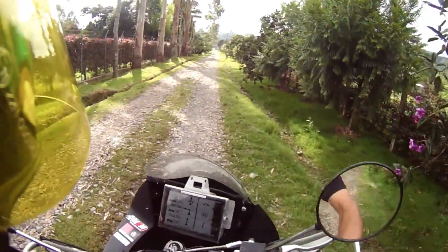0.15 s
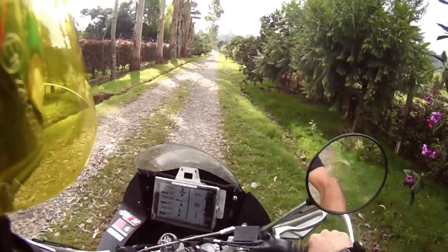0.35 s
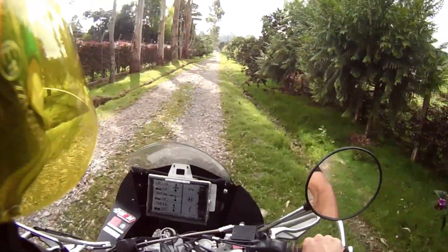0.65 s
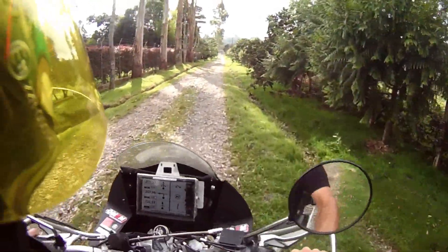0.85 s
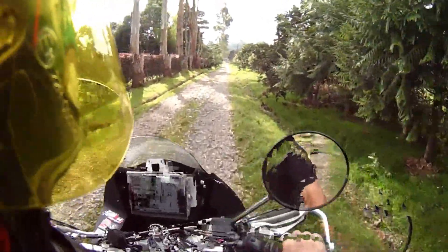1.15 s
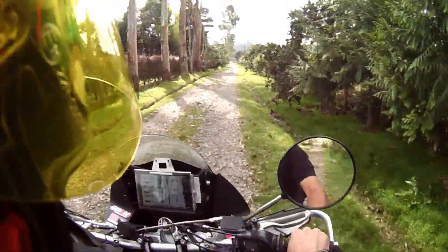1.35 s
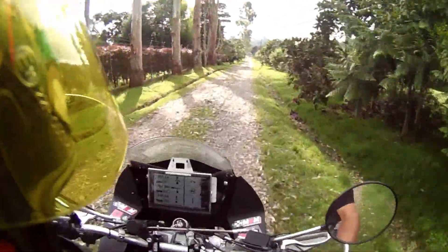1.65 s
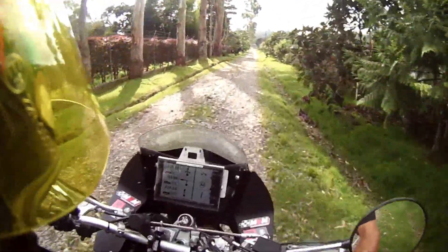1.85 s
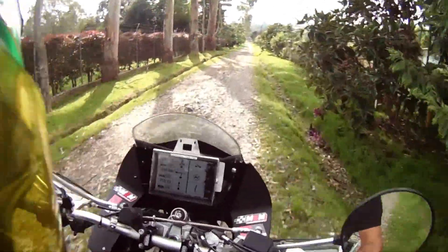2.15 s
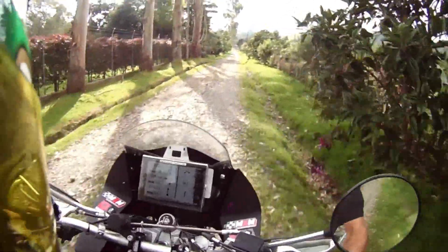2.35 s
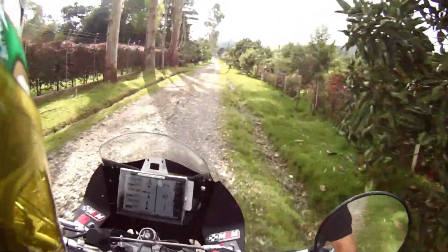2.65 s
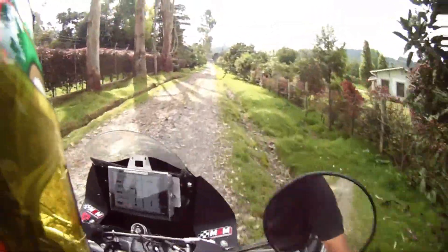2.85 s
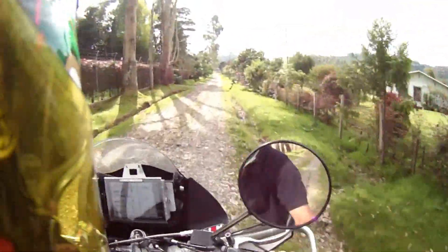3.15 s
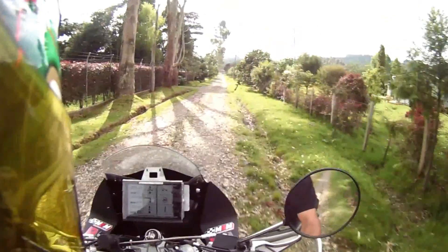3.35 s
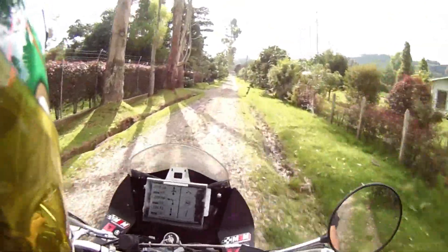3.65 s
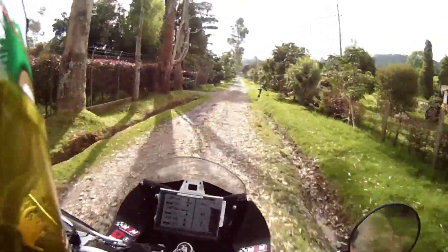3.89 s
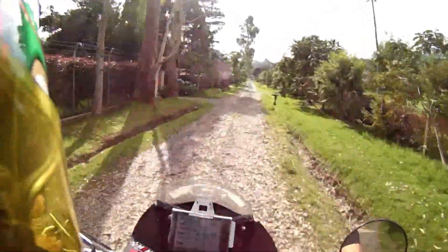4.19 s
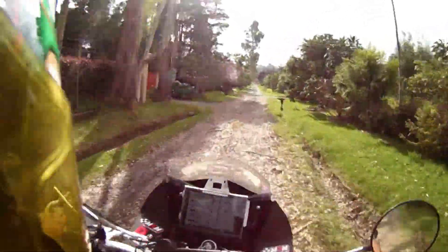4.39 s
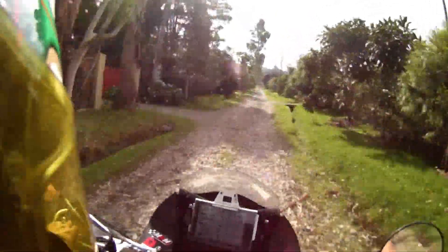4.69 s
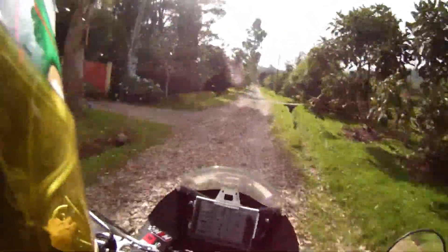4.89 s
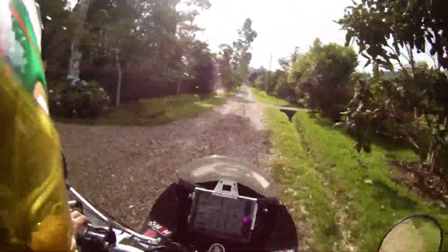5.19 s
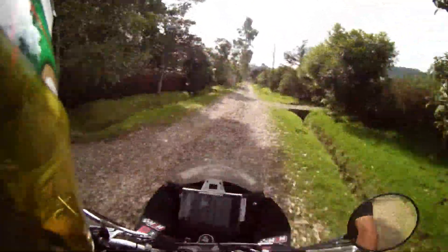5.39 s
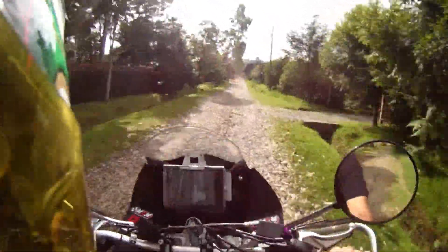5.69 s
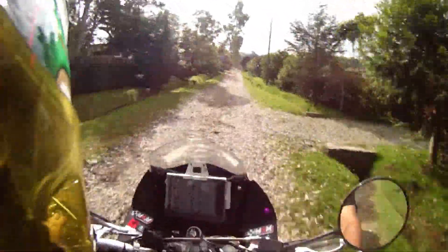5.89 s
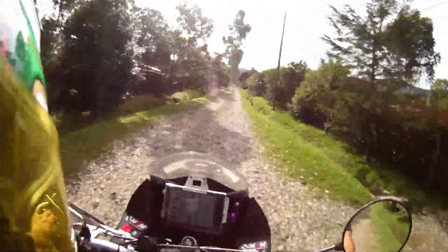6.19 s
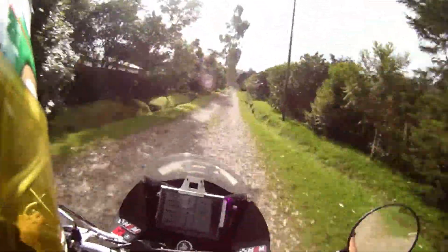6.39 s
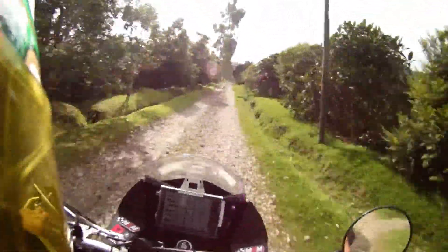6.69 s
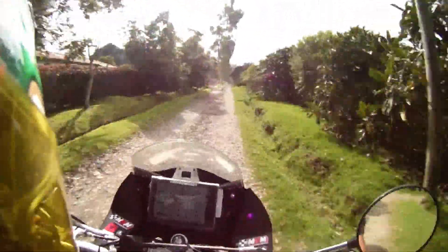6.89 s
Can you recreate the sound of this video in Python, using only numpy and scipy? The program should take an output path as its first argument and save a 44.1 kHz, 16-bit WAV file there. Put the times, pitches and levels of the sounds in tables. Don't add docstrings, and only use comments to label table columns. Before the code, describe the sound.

A single-cylinder motorbike chuffs unevenly, pulls away on gravel, knocks hard once, then is swallowed by roaring, buffeting, overloaded wind with stone cracks.

```python
import sys
import numpy as np
from scipy import signal
from scipy.fft import rfft, irfft
from scipy.io import wavfile
from scipy.ndimage import uniform_filter1d, map_coordinates

SR = 44100
rng = np.random.default_rng(int(sys.argv[2]) if len(sys.argv) > 2 else 0)


def master_out(mix):
    frames = np.transpose(np.atleast_2d(mix))
    ceiling = np.clip(frames, -1, 1)
    pcm = np.round(ceiling * 32767).astype(np.int16)
    wavfile.write(sys.argv[1], SR, pcm)


def invert_db(x):
    u = np.asarray(x, float) / 20
    return 10 ** u


N = 310464
T = np.arange(N) / SR

# (time [s], firing rate [Hz])
FIRING_RATE = [(.7398, 10.63), (.9, 11.13), (1.1, 11.06), (1.3, 12.66), (1.5, 13.97), (1.75, 16.4),
               (2.0, 18.3), (2.3, 21.75), (2.75, 24.8), (3.5, 33.1), (4, 40.3), (4.15, 43.5), (4.3, 43.5),
               (4.45, 31.5), (4.7, 29.4), (5.15, 31.9), (6.05, 36.3), (7.04, 42)]
# (time [s], peak level [dB])
CHUFFS = [(0.0044, -67), (0.0633, -70), (0.119, -47.5), (0.1875, -37), (0.2698, -47.5), (0.31, -34),
          (0.372, -37.5), (0.478, -38), (0.534, -37.5), (0.596, -45.5), (0.627, -49), (0.6779, -50)]
# (time [s], level from the mean [dB])
STROKES = [(.74, -2.5), (.83, -2.5), (.92, -2.5), (1.1, 1.5), (1.27, 2), (1.5, 2.5), (1.57, -1.5),
           (1.64, -1.5), (1.7, 0), (1.765, -5), (1.826, -3.5), (1.885, 1), (1.94, -2), (2.05, 2),
           (2.245, 2), (2.34, -1), (2.39, 5)]
# (time [s], level [dB])
LOAD = [(0, -3), (.3, 3), (.76, 1), (1.8, -1.5), (2.25, -7.5), (3.1, -2), (4, 1.5), (4.2, -0.5), (4.45, -2),
        (4.8, 2), (5.2, 1.5), (5.88, 3), (7.04, 4.5)]
# (frequency [Hz], density [dB per Hz])
CLATTER_COLOUR = [(88, -22.5), (150, -9), (320, -6), (420, -10.5), (950, -2), (1260, -4.5), (1880, -9.5),
                  (2100, -12), (2600, -13.5), (3500, -26.5), (4200, -21.5), (5400, -32.5), (8000, -33.5),
                  (14000, -57.5)]
# (frequency [Hz], width [Hz], gain [dB])
CASE_RINGS = [(328, 24, 6.5), (872, 55, 4.5), (935, 40, -1), (1134, 26, 5.5), (1295, 73, 5), (1420, 69, 6),
              (1760, 110, 3), (2960, 410, 0), (4320, 110, 3.5), (4430, 960, 1.5), (4850, 90, 2.5),
              (7480, 170, 5.5)]
# (frequency [Hz], level [dB], t60 [s], pitch share lost as it dies [1])
STRUCK_MODES = [(896, -13.5, 0.064, 0.13), (1155, -6, 0.23, 0.062), (1199, -6.5, 0.16, -0.065),
                (1398, -4, 0.17, 0.1505), (1904, -8.5, 0.12, 0.058), (2472, -10.5, 0.05, 0.13),
                (2756, -6, 0.072, -0.078)]
# (time [s], frequency [Hz], level above the clatter [dB])
FRAME_HUM = [
    (0, 1170, -1),
    (.32, 1170, 9),
    (.39, 1210, 5),
    (.44, 1215, 9),
    (.56, 1155, 11.5),
    (.65, 1170, -4),
    (.8, 1170, -6.5),
    (7.04, 1150, -8.5),
]
# (start [Hz], end [Hz], width [Hz], level [dB])
HEADER_MODES = [(1320, 915, 68, -4), (1966, 1770, 60, -2), (2905, 2700, 120, -7)]
# (frequency [Hz], level [dB])
PIPE = [(35, -16), (65, -18), (110, -16), (225, -17), (265, -2), (290, -1.5), (325, -4), (380, -16),
        (500, -16)]
# (time [s], stretch [1])
PIPE_STRETCH = [
    (4.4, 1),
    (4.95, 1.12),
    (5.4, 1.12),
    (5.9, 1.04),
]
# (frequency [Hz], density [dB per Hz])
RUMBLE_COLOUR = [(8, -1), (20, 1.5), (35, 4.5), (60, 3), (120, -5), (250, -10.5), (500, -58.5)]
# (time [s], level above the rumble [dB])
BUMPS = [(.5, 5.5), (1.29, 4), (1.76, 7), (2.15, 2), (2.58, 8), (3.07, 6.5), (3.44, 13), (3.81, 1.5),
         (5.06, 6), (5.9, 6.5), (6.38, 5), (6.7, 9), (7.04, 13)]
# (time [s], level [dB], dull part above it [dB])
WIND = [(2.25, -53, -14), (2.6, -52, 0), (3.0, -36, 3.5), (3.22, -41, -15), (3.47, -26.5, 1.5),
        (3.72, -35.5, -3), (3.89, -34.5, -0.5), (4.25, -19.5, -7), (4.35, -32.5, 3), (4.62, -17.5, -17.5),
        (4.76, -25, 1), (5.05, -22.5, -16), (5.56, -16, -16), (5.91, -25, -3), (6.3, -17.5, -16.5),
        (6.4, -20, -5), (6.6, -16.5, -12.5), (7.04, -17, -9.5)]
# (time of the top [s], rms level [dB], width [s], dull part [dB])
GUSTS = [(3.056, -28.5, 0.045, 0.5), (3.119, -27.5, 0.022, -18), (3.279, -33, 0.027, -15),
         (3.442, -24.5, 0.12, -1.5), (3.557, -21.5, 0.11, 0), (3.888, -31, 0.076, 4),
         (3.996, -22.5, 0.044, -1), (4.171, -26, 0.038, -18), (4.372, -16, 0.026, -23),
         (4.464, -15.5, 0.071, -18), (4.545, -18.5, 0.058, -21), (4.806, -17, 0.057, -19),
         (4.901, -17.5, 0.067, -5), (4.992, -15, 0.018, -11), (5.126, -11, 0.012, -7),
         (5.288, -15, 0.029, -22), (5.365, -15, 0.012, -7), (5.457, -12, 0.0095, -25),
         (5.49, -11.5, 0.015, -19), (5.693, -27, 0.032, -21), (5.758, -18.5, 0.01, -18),
         (5.83, -14.5, 0.046, -26), (5.983, -16, 0.12, -9), (6.102, -9, 0.023, -10),
         (6.137, -11.5, 0.017, 0.5), (6.216, -12.5, 0.061, -28), (6.274, -11, 0.012, -23),
         (6.398, -12, 0.048, -5.5), (6.781, -6.5, 0.018, -2), (6.943, -10.5, 0.012, -27)]
# (time of the top [s], rms level [dB], dull part [dB])
PUFFS = [(2.905, -40.5, 16), (3.385, -25.5, 5), (3.494, -20, -5), (3.589, -27, -14), (5.198, -15.5, -22),
         (3.925, -17, -3), (4.134, -33, -8), (4.409, -15, -21), (4.697, -15.5, -5.5), (4.739, -17.5, -8),
         (5.096, -17, -6), (5.159, -15, -2), (5.253, -14, -19), (5.405, -7.5, -32), (5.869, -9, -13),
         (5.904, -15.5, -6), (5.942, -19, -4), (5.998, -9.5, 0.5), (6.169, -10, -1), (6.327, -14, -19),
         (6.452, -9.5, -20), (6.5, -12, -3), (6.528, -8, -15), (6.617, -17.5, -4), (6.743, -19, 2),
         (6.821, -9.5, -8.5), (6.847, -10, -22), (6.872, -8.5, -25), (6.896, -12.5, -10), (6.972, -19, -13)]
# (time [s], depth [dB])
LULLS = [(3.373, -5), (3.58, -7), (3.655, -8), (4.33, -9), (4.363, -2.5), (5.481, -1), (6.092, -2),
         (6.963, -3.5), (5.075, -6), (5.43, -2.5), (5.52, -8.5), (5.8, -3), (5.924, -20), (6.152, -5),
         (6.69, -3.5), (6.793, -9), (6.911, -1.5)]
# (frequency [Hz], density [dB per Hz])
PORT_COLOUR = [(240, -44.5), (400, -6.5), (1090, 1.5), (1410, -2.5), (2500, -32), (3250, -43.5),
               (5500, -120)]
DULL_COLOUR = [(65, -36), (110, -10), (220, -5), (350, -3.5), (490, -4), (700, -3.5), (910, -10.5),
               (1540, -100)]
BRIGHT_COLOUR = [(1000, -7), (1700, 5.5), (2460, -7), (2670, -9), (4260, -15.5), (5500, -35.5),
                 (7600, -49.5), (10000, -65), (14000, -79)]
# (time [s], frequency [Hz])
PORT_PITCH = [(2.85, 1100), (3.41, 879), (3.8, 1040), (4.17, 929.4), (4.57, 1102), (4.72, 901.4),
              (5.13, 1080), (5.6, 1040), (5.82, 1129), (5.89, 898), (6.09, 1029), (6.15, 858), (6.35, 1091),
              (6.51, 899.4), (6.57, 1035), (6.72, 850), (6.78, 1049), (7.04, 1079)]
# (time [s], peak level [dB], frequency [Hz], length [cycles], sign [1])
SLAPS = [(1.734, -26, 900, 1.5, 1), (1.835, -29, 950, 2.5, 1), (1.8915, -23, 600, .7, -1),
         (2.344, -32, 1150, 2.5, 1), (3.5875, -13, 1050, 2.5, 1), (5.098, -9, 1250, 1, -1),
         (5.1255, -3, 1100, .75, 1), (5.125, -18.5, 3400, 1.5, 1), (5.13, -6, 1300, .8, 1),
         (5.131, -21, 3300, 1.2, 1), (5.158, -19.5, 3800, 2, 1), (5.161, -5.5, 900, .9, -1),
         (5.981, -2, 1100, .9, 1), (6.054, -1.5, 1050, 1.1, -1), (6.17, -1.5, 1000, 1, -1),
         (6.4958, .55, 900, .62, -1), (6.6162, -1.5, 1000, .9, 1), (6.7055, -.2, 950, .9, 1),
         (6.7713, 1.7, 1200, .75, 1), (6.7801, -.5, 1250, .9, 1), (6.7837, 2.7, 1100, .65, 1),
         (6.7872, -.5, 1100, 1, -1), (6.8213, 2.3, 1000, .72, 1)]
# (time [s], peak level [dB],
# frequency [Hz])
EDDIES = [(3.0511, -17, 880), (3.2503, -18, 1240), (3.2813, -17, 970), (3.2875, -17, 1050),
          (3.3868, -14, 990), (3.4939, -8, 940), (3.5263, -9, 880), (3.5454, -9, 910),
          (3.5572, -8, 920), (3.5907, -10, 1040), (3.6258, -14, 740), (3.6902, -16, 1200),
          (3.8871, -14, 1200), (3.9226, -12, 850), (3.9688, -13, 970), (4.0043, -11, 980),
          (4.0452, -10, 1030), (4.1332, -10, 930), (4.1584, -10, 770), (4.17, -9, 820),
          (4.2206, -10, 800), (4.2905, -9, 1050), (4.3706, -9, 1040), (4.4013, -8, 840),
          (4.4075, -7, 1010), (4.4414, -9, 1020), (4.4482, -8, 1000), (4.5215, -8, 1070),
          (4.5737, -9, 1160), (4.6724, -9, 1130), (4.699, -8, 1000), (4.7122, -9, 710),
          (4.7384, -10, 1050), (4.7843, -9, 970), (4.7912, -7, 930), (4.8059, -8, 850),
          (4.8304, -8, 1100), (4.8378, -10, 830), (4.8803, -10, 960), (5.0027, -10, 1180),
          (5.0362, -12, 1240), (5.0953, -9, 1270), (5.199, -8, 1120), (5.2532, -7, 1210),
          (5.2905, -5, 980), (5.3227, -9, 1120), (5.3557, -5, 890), (5.3637, -8, 1270),
          (5.3695, -5, 870), (5.4006, -3, 1000),
          (5.4073, -5, 1050), (5.4533, -8, 1160), (5.4895, -3, 1170), (5.5038, -6, 1000),
               (5.5362, -5, 1000), (5.6205, -5, 1060), (5.6694, -9, 1160), (5.6917, -7, 1230),
               (5.7015, -5, 1170), (5.7084, -8, 1050), (5.7521, -9, 1100), (5.7626, -9, 1000),
               (5.8285, -5, 1030), (5.8651, -5, 910), (5.9045, -5, 980), (5.9419, -7, 1010),
               (5.9966, -3, 890), (6.0729, -6, 1060), (6.1003, -4, 1100), (6.1108, -5, 890),
               (6.1336, -2, 900), (6.2116, -2, 990), (6.2369, -5, 1110), (6.2767, -5, 1050),
               (6.2968, -6, 1180), (6.3212, -6, 990), (6.3282, -6, 1090), (6.3423, -7, 940),
               (6.3656, -5, 880), (6.3783, -5, 980), (6.3983, -2, 960), (6.4193, -2, 1100),
               (6.4306, -5, 1010), (6.4561, -4, 960), (6.5291, -4, 800), (6.5612, -7, 1130),
               (6.6485, -7, 1000), (6.6658, -7, 780), (6.7126, -6, 990), (6.7361, -6, 980),
               (6.7444, -5, 850), (6.7504, -4, 910), (6.8492, -1, 1010), (6.8717, -2, 1030),
               (6.8923, -4, 1060), (6.8983, -4, 960), (6.9374, -6, 1120), (6.9458, -4, 1090),
               (6.9719, -5, 1200), (7.019, -4, 1220)]
# (time [s], peak level [dB], frequency, negative if inverted [Hz], rise [s], t60 [s])
JOLTS = [(2.2135, -24, -140, .002, .04), (2.222, -19, 54, .006, .17), (2.293, -29, -52, .006, .15),
         (2.35, -26, 33, .012, .12), (2.366, -12, 51, .058, .11), (2.4245, -19, 170, .002, .04),
         (2.4418, 2, 165, .007, .052), (2.4462, -7, 82, .003, .12), (2.4385, -12.5, -160, .002, .03),
         (2.4563, -15, -145, .002, .032), (2.4635, -17, 75, .002, .05), (2.479, -18, 60, .005, .045),
         (2.505, -25, -110, .003, .035)]
# (time [s], peak level [dB], frequency [Hz], rise [s], t60 [s])
RATTLE = [
    (2.4448, -14, 1600, 0.0016, 0.016),
    (2.4513, -7.5, 930, 0.0006, 0.018),
    (2.459, -11.5, 1540, 0.0011, .022),
    (2.421, -32, 3300, 0.00066, 0.007),
    (2.42, -39, 5600, .0004, .004),
]
# (frequency [Hz], density [dB per Hz])
CRACK_COLOUR = [(300, -17), (600, -8), (900, 2.5), (2500, -5.5), (4000, -17), (8000, -33.5), (14000, -41.5)]
# (time [s], peak level [dB])
STONES = [(2.6627, -29), (4.0371, -23), (4.1373, -24), (4.506, -28), (4.9166, -28.5), (5.1236, -22),
          (5.156, -24), (5.1874, -26), (5.398, -20), (5.4578, -21), (5.6943, -26), (5.9963, -26),
          (6.051, -26), (6.0709, -28.5), (6.0977, -23), (6.1375, -26), (6.1677, -30), (6.2815, -27),
          (6.3738, -24), (6.4296, -21), (6.4945, -25), (6.5249, -21), (6.5823, -22.5), (6.6142, -19),
          (6.702, -16.5), (6.7404, -33), (6.7714, -19), (6.8033, -27), (6.8187, -19), (6.8477, -18),
          (6.969, -21), (7.014, -20)]
# (frequency [Hz], density [dB per Hz])
STONE_COLOUR = [(1500, -17), (2200, 2), (3400, -3.5), (4600, -10.5), (7000, -37), (14000, -60)]
# (frequency [Hz], density [dB per Hz])
HISS_COLOUR = [(3000, -30), (6000, -6), (7550, -1), (9000, -3), (11000, -1), (14000, 1)]

SHIFT_S, GEAR_STEP = 4.38, 1.45


def evened(x):
    return x / np.sqrt(np.mean(x ** 2) + 1e-20)


def steadied(x, size):
    power = uniform_filter1d(uniform_filter1d(x ** 2, size), size)
    return x / np.sqrt(power)


def read(points, hz):
    f, value = np.transpose(points)
    return np.interp(np.log(hz + 1), np.log(f + 1), value)


def follow(rows):
    s, *columns = np.transpose(rows)
    return [np.interp(T, s, c) for c in columns]


def noise(points, rings=(), pops=0.):
    hz = np.fft.rfftfreq(N, 1 / SR)
    db = read(points, hz) + sum(d / (1 + (2 * (hz - f) / w) ** 2) for f, w, d in rings)
    grains_db = pops * np.minimum(rng.exponential(1, N), 5)
    drive = rng.standard_normal(N) * invert_db(grains_db)
    return evened(irfft(rfft(drive) * invert_db(db), N))


def flicker(top_hz, low_hz=0.):
    hz = np.fft.rfftfreq(N, 1 / SR)
    response = hz / (hz + low_hz + 1e-9) / (1 + (hz / top_hz) ** 2)
    return evened(irfft(rfft(rng.standard_normal(N)) * response, N))


def add(mix, s, sound):
    part = mix[round(s * SR):][:len(sound)]
    part += sound[:len(part)]


def lowpass(x, hz):
    return signal.sosfiltfilt(signal.butter(2, hz, fs=SR, output="sos"), x)


def resonate(x, hz, width_hz):
    turn = np.exp(2j * np.pi * np.cumsum(hz) / SR)
    r = np.exp(-np.pi * width_hz / SR)
    return 2 * (turn * signal.lfilter([1 - r], [1, -r], x / turn)).real


def doublings():
    rate, = follow(FIRING_RATE)
    engine_speed = np.log2(rate / rate[0])
    new_gear = np.clip((T - SHIFT_S) / .15 + .5, 0, 1)
    return engine_speed, engine_speed + np.log2(GEAR_STEP) * new_gear


def engine_level(idle_db, rise_db, load_share):
    return idle_db + rise_db * doublings()[0] + load_share * follow(LOAD)[0]


def firings(turns):
    fired = (np.diff(np.floor(turns), prepend=0) > 0) & (turns >= 0)
    strength_db = np.where(T < 2.42, follow(STROKES)[0], 1.2 * rng.standard_normal(N))
    train = fired * invert_db(strength_db)
    for s, db in CHUFFS:
        add(train, s, invert_db(np.array([db + 39.0])))
    return train


def throbbing(train, turns):
    t = T[:SR // 5]
    bang = np.exp(-(t / 0.045) ** 0.83) * np.minimum(t / 0.0012, 1)
    valve = 0.53 * (t > .02) * np.exp(-(t - .02) / 0.003)
    between = 0.38 + 0.092 * doublings()[0]
    gate = between + signal.oaconvolve(train, bang + valve)[:N]
    gate = gate * invert_db(-2 * (turns % 1) ** 3 * (turns >= 0) * np.clip(2.6 - T, 0, 1))
    norm = np.sqrt(uniform_filter1d(gate ** 2, SR // 3))
    clatter = noise(CLATTER_COLOUR, CASE_RINGS, pops=2.4) * invert_db(1.12 * flicker(160.0))
    low, body = lowpass(clatter, 8000), lowpass(clatter, 1400)
    tick = invert_db(-9) * signal.oaconvolve(train, np.exp(-t[:900] / 0.0018))[:N] * (low - body)
    dip_db = -9 * np.exp(-((T - 3.8) / .06) ** 2)
    top_gain = invert_db(0.5 * doublings()[0] + dip_db)
    top = top_gain * (clatter - low) * np.sqrt(uniform_filter1d(gate, size=300) * norm)
    return tick + low * gate + top, norm


def frame_and_header(clatter, train):
    frame_hz, frame_db = follow(FRAME_HUM)
    rings = invert_db(frame_db) * resonate(clatter, frame_hz, 21)
    since = T - np.maximum.accumulate(T * (train > 0))
    for start_hz, end_hz, width_hz, db in HEADER_MODES:
        sagging_hz = end_hz + (start_hz - end_hz) * np.exp(-since / .03)
        rings = rings + invert_db(db) * resonate(clatter, sagging_hz, width_hz)
    return rings


def struck_case(train):
    t = T[:SR // 5]
    blows = signal.oaconvolve(train, np.exp(-t[:1200] / 0.012))[:N] * rng.standard_normal(N)
    modes = 0
    for hz, db, t60, glide in STRUCK_MODES:
        bent_t = t + glide * 0.0199 * (1 - np.exp(-t / 0.018))
        modes = modes + invert_db(db - 60 * t / t60) * np.sin(2 * np.pi * hz * bent_t)
    return invert_db(-22.0) * signal.oaconvolve(blows, modes)[:N]


def pipe(turns):
    orders = np.arange(1, 13)[:, None]
    rate, = follow(FIRING_RATE)
    stretch, = follow(PIPE_STRETCH)
    wobble = np.array([flicker(4.1)[::8] for _ in range(4)])[orders[:, 0] % 4]
    order_db = read(PIPE, orders * (rate / stretch)[::8]) + 1.1 * wobble
    note = invert_db(order_db) * np.cos(2 * np.pi * (orders * turns[::8] + rng.random((12, 1))))
    note = signal.resample_poly(note.sum(0), 8, 1)[:N]
    return invert_db(engine_level(-50.5, 7.3, 1.28)) * note


def crank(turns):
    coast_db = -10 * uniform_filter1d(1. * (T > 3.98) * (T < 4.56), size=3000)
    shake = invert_db(coast_db) * np.cos(2 * np.pi * 2 * turns)
    return invert_db(engine_level(-52.5, 7, .3) + 1.4 * flicker(6.)) * shake


def engine():
    rate, = follow(FIRING_RATE)
    turns = np.cumsum(rate) / SR
    turns = turns - turns[round(FIRING_RATE[0][0] * SR)]
    train = firings(turns)
    clatter, norm = throbbing(train, turns)
    clatter = 0.86 * clatter + frame_and_header(clatter, train)
    clatter = clatter + struck_case(train)
    low_gear_db = 1.5 * np.clip((SHIFT_S - T) / .35 + 1, 0, 1)
    clatter_gain = invert_db(engine_level(-66.5, 9.74, 0.22) + 19.5 + low_gear_db)
    return clatter_gain * clatter / norm + pipe(turns) + crank(turns)


def rumble():
    bumps_db = sum(d * np.exp(-((T - s) / 0.11) ** 2) for s, d in BUMPS)
    db = -55.5 + 7 * doublings()[1] + bumps_db
    return noise(RUMBLE_COLOUR) * invert_db(db - 1.0 + 2.0 * flicker(10., 0.97))


def gust_power():
    level_db, dull_db = follow(WIND)
    speed_db = 13.5 * (doublings()[1] - 2)
    bright_db = -13 + speed_db - 0.34 * (level_db + 23.0)
    level_db = level_db + 2.2 * flicker(27.0, 9.2)
    onset = np.clip((T - 1.9) / .5, 0, 1) ** 2
    power = invert_db(2 * (level_db - 1.0 + np.array([0 * T, dull_db, bright_db]))) * onset
    puffs = [(s, db, 0.013, dull) for s, db, dull in PUFFS]
    for s, db, length, dull in GUSTS + puffs:
        swell = np.hanning(round(1.6 * max(length, .004) * SR))
        gust_bright_db = -24 + 2.0 + 2.18 * speed_db[round(s * SR)]
        for row, part_db in zip(power, (0, dull, gust_bright_db)):
            add(row, s - len(swell) / 2 / SR, invert_db(2 * (db + part_db - 3.0)) * swell)
    return power


def turbulence():
    eddying = 1.3 * flicker(280.0, 40.)
    kinds = (PORT_COLOUR, .9, 4.2), (DULL_COLOUR, .7, 4.6), (BRIGHT_COLOUR, .9, 3.6)
    port, dull, bright = [steadied(noise(colour, pops=pops) * invert_db(depth * eddying), size=450)
                          for colour, depth, pops in kinds]
    pitch, = follow(PORT_PITCH)
    warped_time = np.cumsum((pitch / 1001) ** .7)
    port = map_coordinates(port, [warped_time], order=3, mode="mirror")
    whistle = evened(resonate(port, 1.08 * pitch * invert_db(1.6 * flicker(14.)), 90))
    return [evened(port + invert_db(-7) * whistle), dull, bright]


def burst_eddies(out):
    t = np.arange(-200, 200) / SR
    bursts = [(s, db - 1, hz, 0.78, rng.choice([-1, 1])) for s, db, hz in EDDIES]
    for s, db, hz, cycles, sign in SLAPS + bursts:
        at_port = (hz < 2000) * (s > 2.6)
        shape = np.exp(-(t * hz / cycles) ** 2)
        ring = np.maximum(shape, .38 * np.exp(-abs(t) / .0035) * (t > 0) * at_port)
        under = out[round(s * SR) - 200:][:len(t)]
        pulse = ring * np.hanning(len(t)) ** .25 * sign * invert_db(db) * np.cos(2 * np.pi * hz * t)
        add(out, s - 200 / SR, pulse - shape ** .5 * under * at_port)


def wind():
    power, parts = gust_power(), turbulence()
    low_wind = lowpass(parts[1], 257)
    parts[1] = parts[1] - low_wind
    low_wind = low_wind * invert_db(-2.0) * np.sqrt(abs(uniform_filter1d(power[1], round(.15 * SR))))
    lulls_db = sum(db * np.exp(-((T - s) / 0.0059) ** 2) for s, db in LULLS)
    out = low_wind + (np.sqrt(power) * parts).sum(0) * invert_db(lulls_db)
    mean_square = uniform_filter1d(uniform_filter1d(out ** 2, size=40), size=40)
    swing = np.sqrt(2 * mean_square + 1e-12)
    out = out / (1 + (swing / 0.99) ** 4) ** 0.39
    burst_eddies(out)
    return out


def knocks():
    out, t = np.zeros(N), T[:SR // 3]
    for s, db, hz, rise, t60 in JOLTS + RATTLE:
        envelope = invert_db(db - 60 * np.maximum(t - rise, 0) / t60) * np.minimum(t / rise, 1)
        add(out, s, envelope * np.sin(2 * np.pi * hz * t))
    since = T - 2.452
    shape = np.exp(-(since / 0.0011) ** 2) + 0.27 * np.exp(-(since / 0.0078) ** 2)
    return out + invert_db(-13) * shape * noise(CRACK_COLOUR)


def stones():
    road, t = doublings()[1], T[:900]
    strength = invert_db(-37.5 + 43 * (road - road[-1]))
    for s, db in STONES:
        add(strength, s, invert_db(db - 8) * np.exp(-t / 0.0034) * np.minimum(t * 1200, 1))
    return strength * noise(STONE_COLOUR, pops=2.7)


def scene():
    hiss = invert_db(-77.5) * noise(HISS_COLOUR)
    return (hiss + engine() + rumble() + wind() + knocks() + stones())[None]


def low_pass(x):
    return signal.sosfilt(signal.butter(12, 14210, fs=SR, output="sos"), x)


def record(dry):
    clipped = np.clip(dry, -1.005, 1.005)
    mix = clipped * np.minimum(T[::-1] * 500, 1)
    return low_pass(mix)


dry = scene()
out = record(dry)
master_out(out)
```